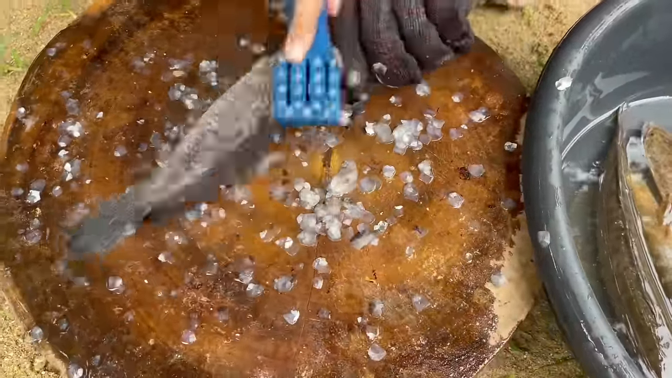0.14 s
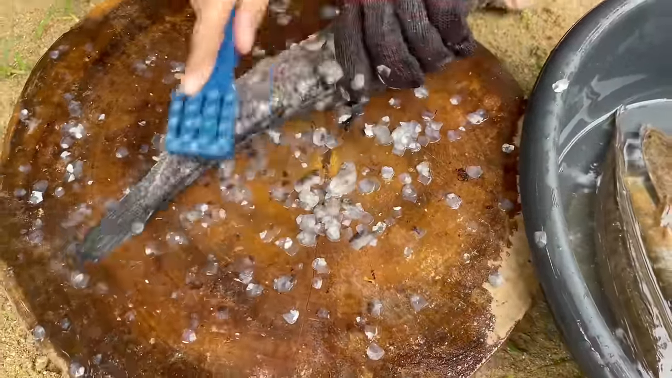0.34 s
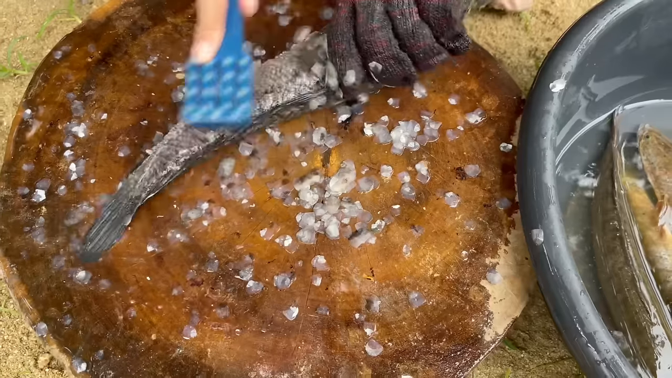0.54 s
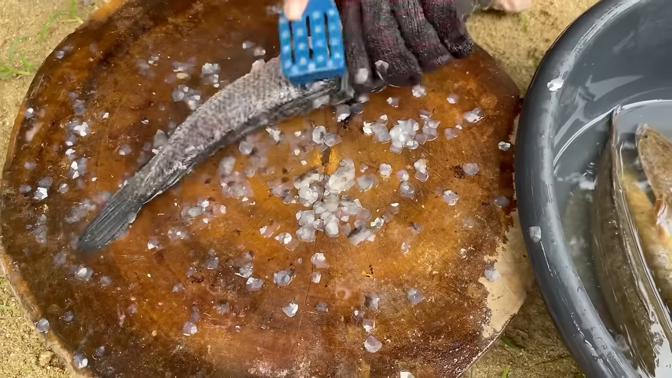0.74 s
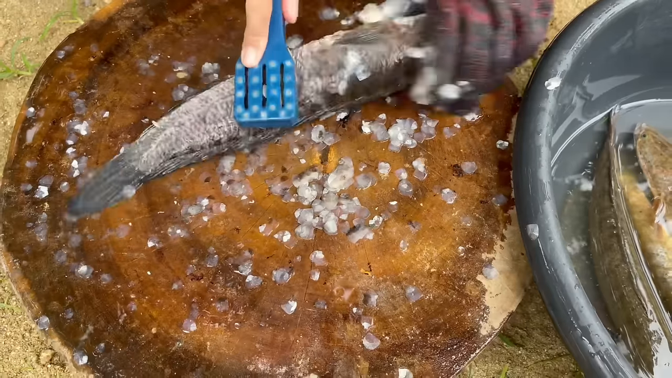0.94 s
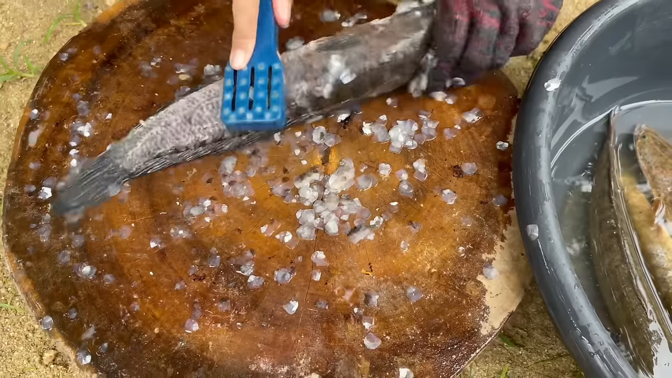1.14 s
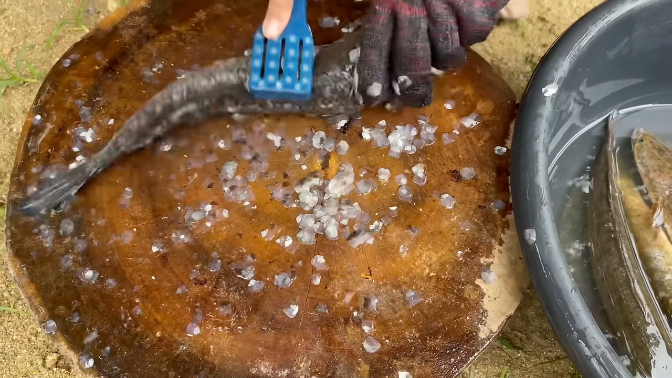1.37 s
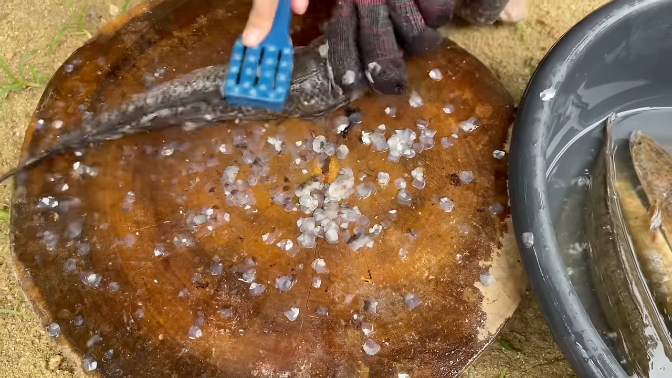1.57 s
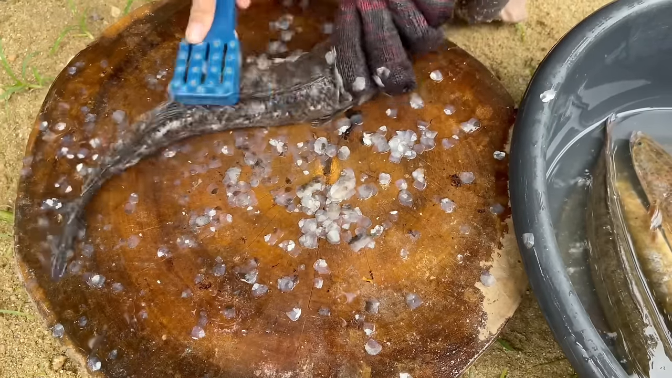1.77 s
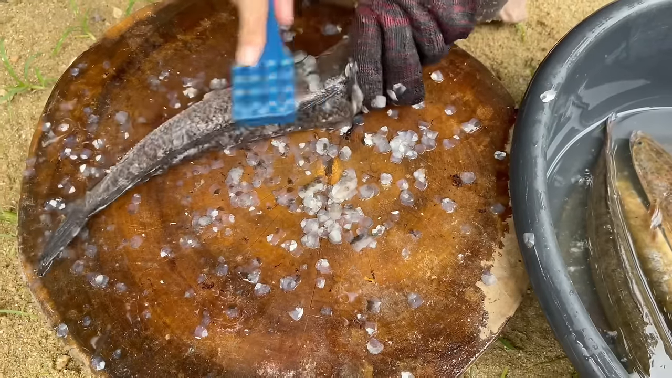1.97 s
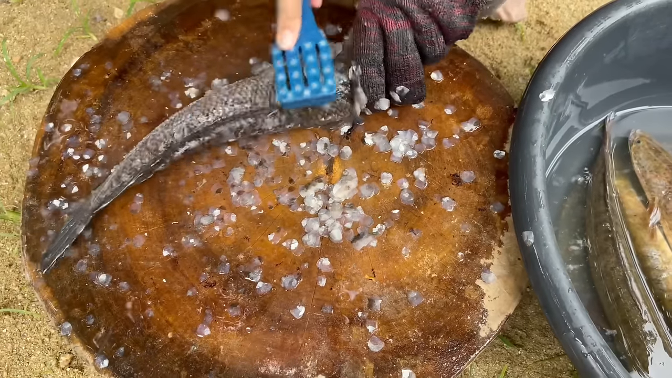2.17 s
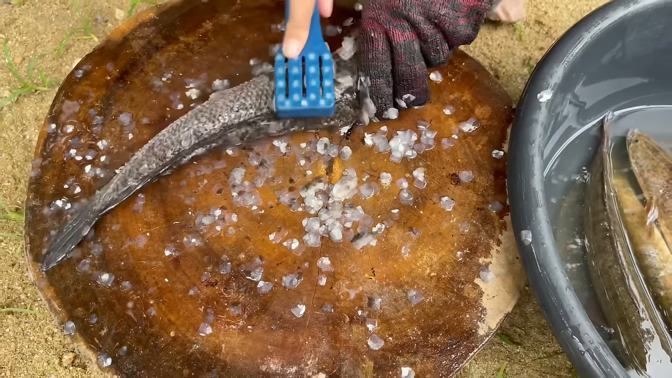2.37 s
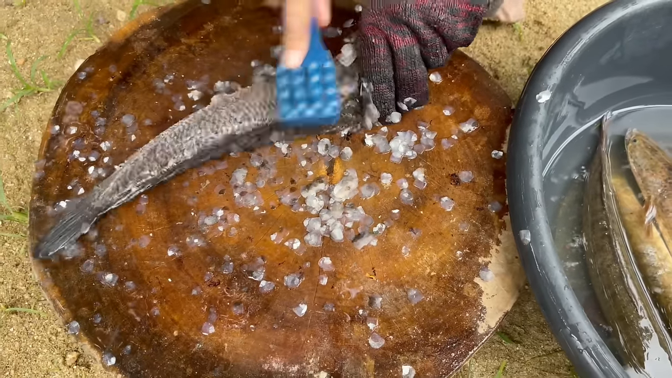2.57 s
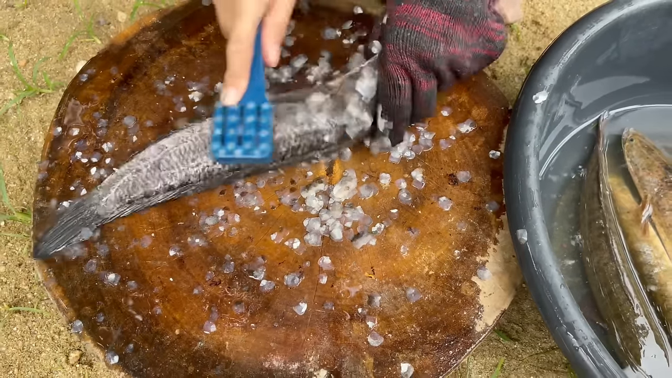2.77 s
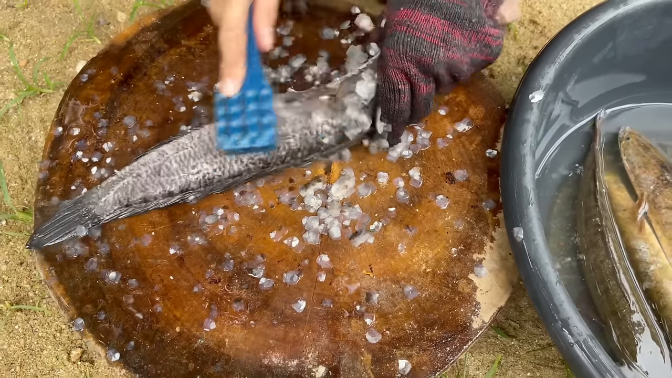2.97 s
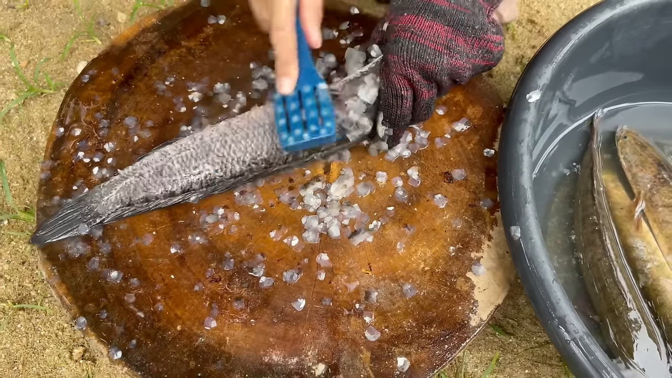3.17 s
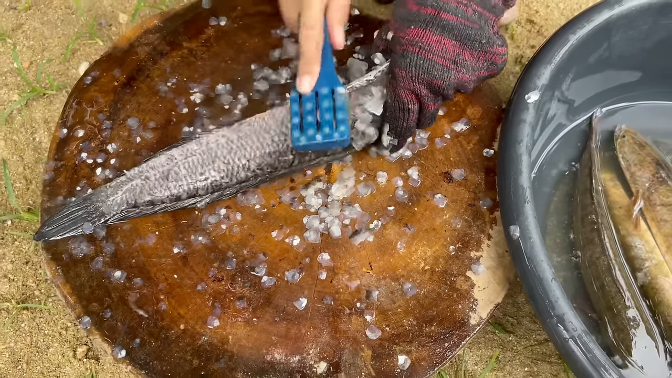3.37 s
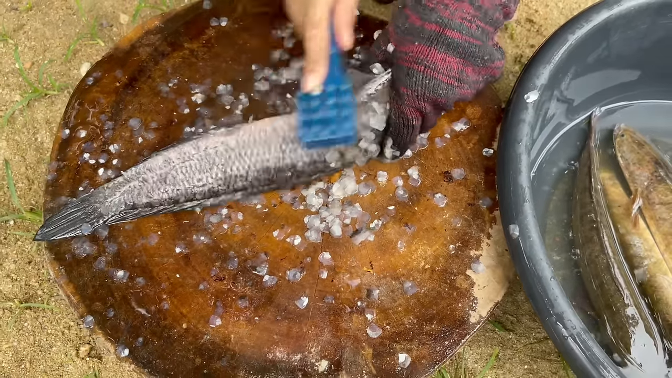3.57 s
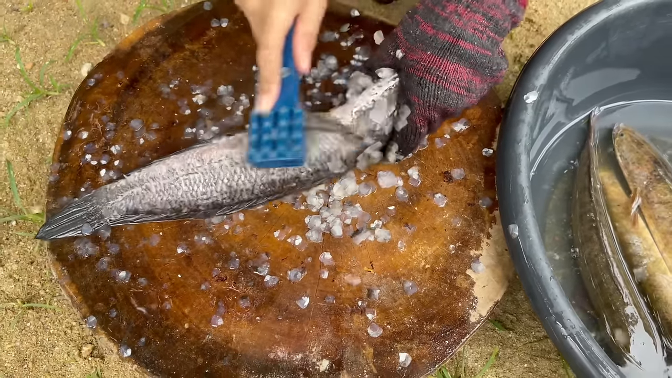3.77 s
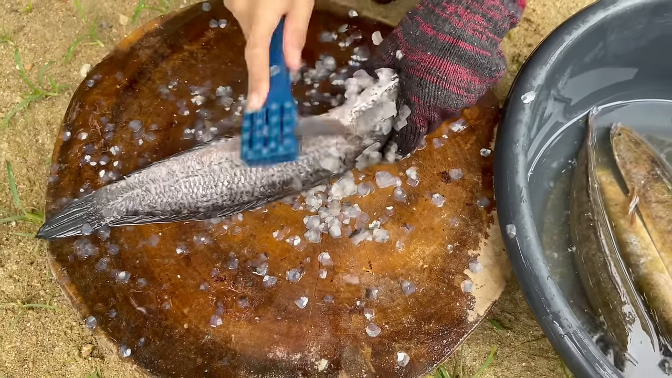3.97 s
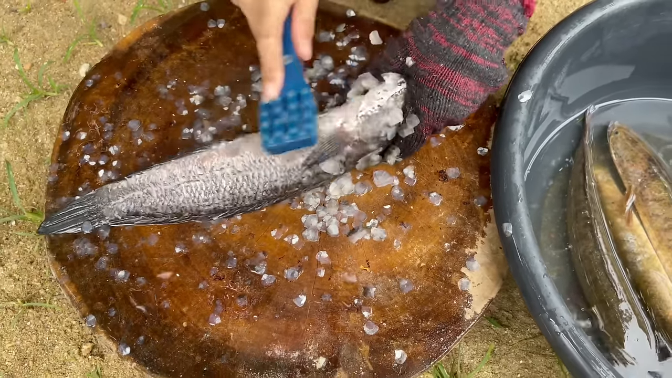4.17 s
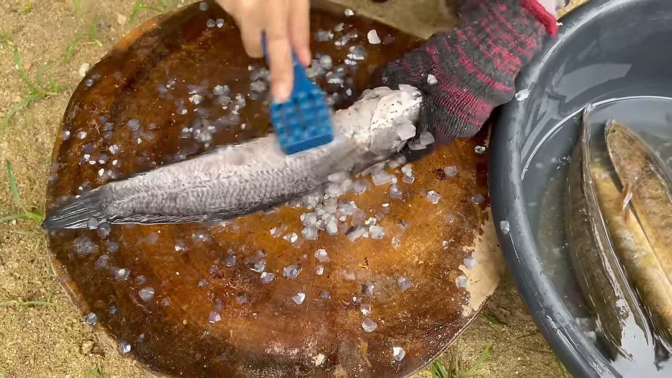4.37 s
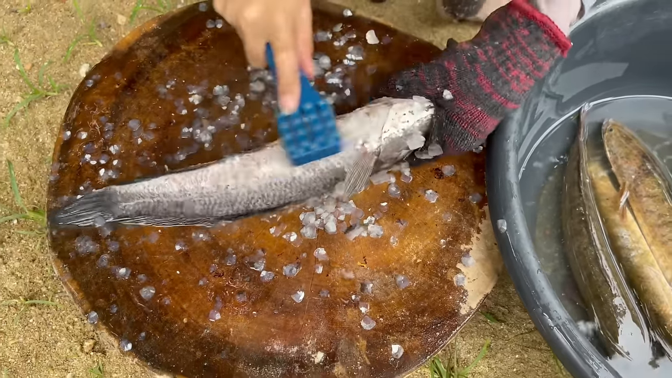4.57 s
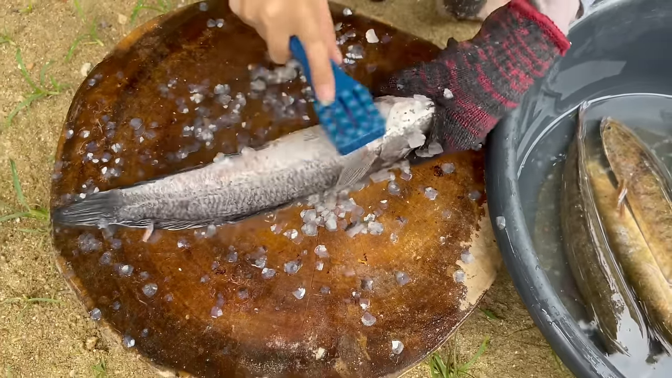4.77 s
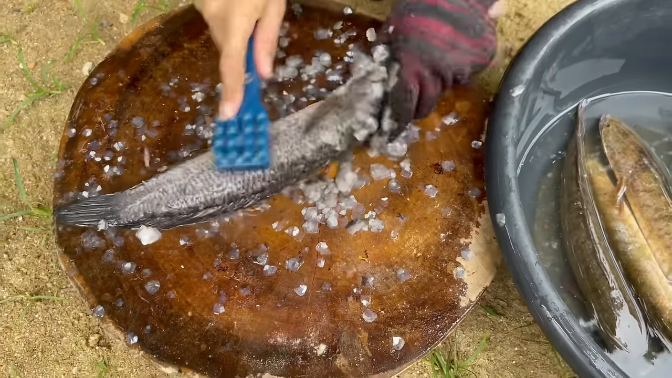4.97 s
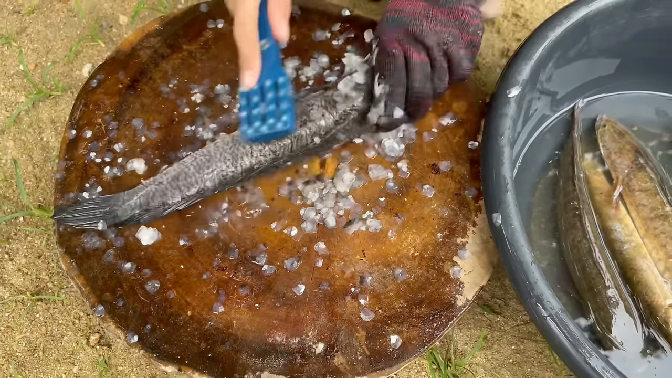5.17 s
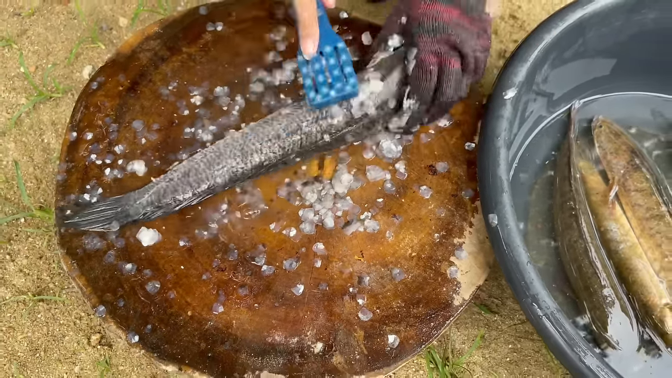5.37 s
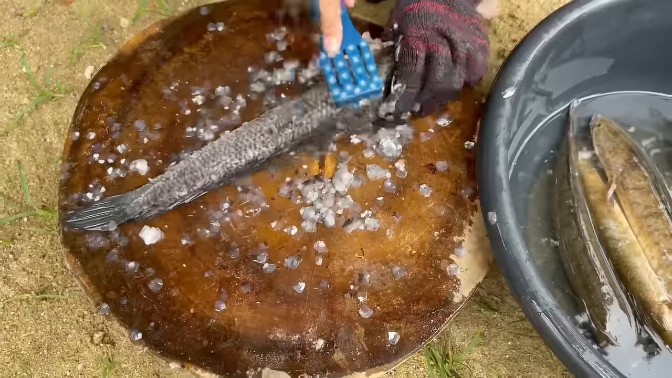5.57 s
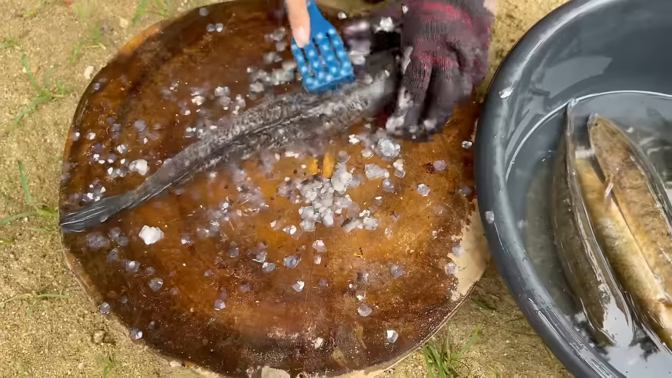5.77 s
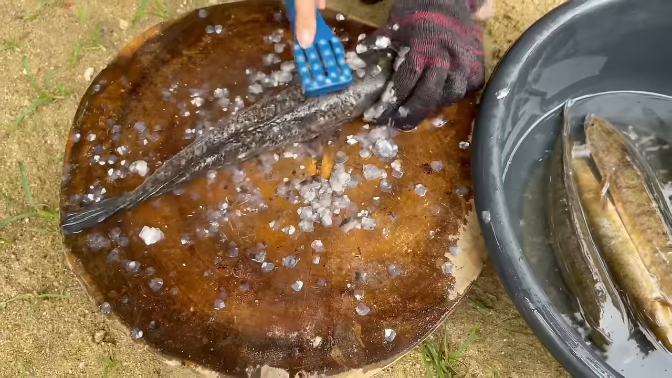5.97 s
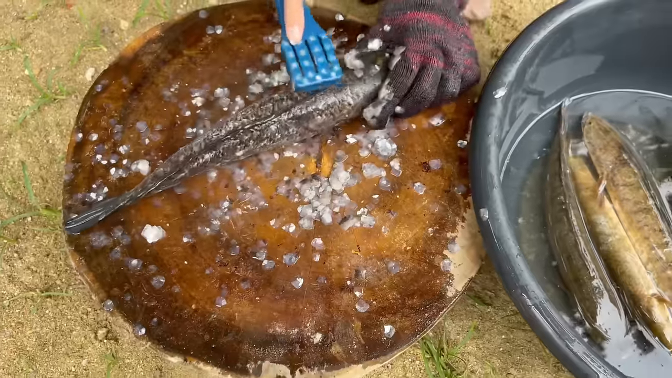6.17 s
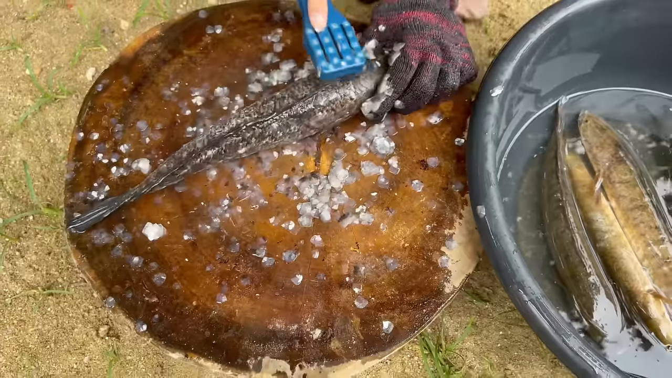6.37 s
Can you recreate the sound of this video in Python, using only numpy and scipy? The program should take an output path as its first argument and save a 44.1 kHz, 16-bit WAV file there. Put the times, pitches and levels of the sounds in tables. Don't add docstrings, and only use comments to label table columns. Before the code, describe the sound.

Close to a phone microphone in an open yard, a toothed plastic scaler rasps a fish in short uneven strokes. Each scrape is gritty and hissy, with crackling scales, sharp snaps and a low hollow drumming of fish and wooden block. Strokes grow denser and loudest around three seconds, then lighten and thin out. Behind run a steady high cicada chorus, repeated cricket trills, faint bird whistles and distant rumble.

```python
import sys
import numpy as np
from scipy import signal
from scipy.fft import rfft, irfft
from scipy.io import wavfile
from scipy.ndimage import uniform_filter1d

SR = 44100
rng = np.random.default_rng(int(sys.argv[2]) if len(sys.argv) > 2 else 0)


def file_out(sig):
    cols = np.atleast_2d(sig).T
    lim = np.clip(cols, -1, 1)
    pcm = np.round(lim * 32767).astype(np.int16)
    wavfile.write(sys.argv[1], SR, pcm)


def magnitude_from_level(level_db):
    exponent = np.asarray(level_db, float) / 20
    return 10 ** exponent


N = 283563
TIME = np.arange(N) / SR


def evened(x):
    return x / np.sqrt(np.mean(x ** 2) + 1e-20)


def read(points, hz):
    f, *columns = np.transpose(points)
    return [np.interp(np.log(hz + 1), np.log(f + 1), c) for c in columns]


def follow(points):
    return np.interp(TIME, *np.transpose(points))


def colour(x, points):
    gain_db = read(points, np.fft.rfftfreq(N, 1 / SR))[0]
    return irfft(rfft(x) * magnitude_from_level(gain_db), N)


def resonate(x, hz, width):
    turn = np.exp(2j * np.pi * np.cumsum(hz * np.ones(N)) / SR)
    decay = np.exp(-np.pi * width / SR)
    return 2 * (turn * signal.lfilter([1 - decay], [1, -decay], x / turn)).real


def slips(per_s, spread_db, last_s):
    size = magnitude_from_level(spread_db * np.minimum(rng.exponential(1, N), 4))
    size = size * (rng.random(N) < per_s / SR)
    puff = signal.filtfilt([1], [1, -np.exp(-1 / (last_s * SR))], size)
    return evened(puff * rng.standard_normal(N))


def shape(times, levels_db, rise_s, fall_s):
    t = np.maximum.accumulate([times[0] - rise_s, *times, max(times) + fall_s])
    span = slice(max(round(t[0] * SR), 0), round(t[-1] * SR))
    levels_db = [levels_db[0] - 28.5, *levels_db, levels_db[-1] - 23]
    return span, magnitude_from_level(np.interp(TIME[span], t, levels_db))


def fade(start, end, ramp_s):
    return np.clip(np.minimum(TIME - start, end - TIME) / ramp_s, 0, 1)


def wash(points, patchy_db, level):
    a, b, patches = rng.standard_normal((N // 256 + 5, 513, 2, 3)).T
    patches = uniform_filter1d(patches[0], size=12, axis=0)
    patches = evened(uniform_filter1d(patches, size=14, axis=1))
    noise = signal.istft((a + 1j * b) * magnitude_from_level(patchy_db * patches), nperseg=1024, noverlap=768)[1][:, :N]
    return magnitude_from_level(follow(level)) * evened(colour(noise, points))


# (frequency [Hz], density [dB per Hz])
RUMBLE_SPECTRUM = [(32, -46), (43, -8), (60, 2.5), (100, -2), (160, -10.5), (300, -20), (500, -67.5)]
# (time [s], level [dB])
RUMBLE_LEVEL = [(0.0, -53), (0.09, -44.5), (6.32, -44.5), (6.43, -52)]


def rumble():
    return wash(RUMBLE_SPECTRUM, 1.56, RUMBLE_LEVEL)


# (frequency [Hz], density [dB per Hz])
YARD_SPECTRUM = [(60, -1), (200, -2), (400, -5), (700, -6), (1300, -9.5), (2500, -10.5), (3600, -9.5),
                 (5400, -10), (7000, -13.5)]
# (time [s], level [dB])
YARD_LEVEL = [(0.0, -46.5), (0.61, -47.5), (3.04, -48.5), (6.43, -48.5)]


def yard():
    return magnitude_from_level(3.2) * wash(YARD_SPECTRUM, 3.2, YARD_LEVEL)


# (frequency [Hz], density [dB per Hz])
CHORUS_SPECTRUM = [(5700, -57), (6200, -4.5), (6800, 5.5), (7800, 0), (8600, -2), (9700, -11),
                   (11100, -2.5), (12400, -17.5), (13100, -6.5), (15600, -48), (16100, -66)]
# (time [s], level [dB])
CHORUS_LEVEL = [(0.0, -41), (3.97, -40.5), (5.37, -40), (6.43, -40)]


def cicadas():
    return magnitude_from_level(2.5) * wash(CHORUS_SPECTRUM, 2.2, CHORUS_LEVEL)


# (time [s], pressed flat [0-1])
GRIP_COURSE = [(0, 0.08), (.4, 0), (.7, 0.23), (1.3, 0.23), (2.1, 0.03), (2.6, 0.4), (3.1, 0.72),
               (3.6, 0.66), (3.85, 0.9), (5, 0.4), (5.4, 1), (5.55, 1), (6.43, 0.45)]


def pressed():
    return np.clip(follow(GRIP_COURSE), 0, 1)


# (frequency [Hz], width [Hz], level held loosely [dB], level pressed flat [dB])
SCALER_MODES = [(1120, 1800, -20, -34.5), (2004, 120, -19, -3), (2680, 1320, -19.5, -11.5),
                (3557, 367, 2, 7), (3945, 1430, 2.5, 0.5), (5430, 2710, 1, -4)]


def scaler_ring(x):
    flat, ring = pressed(), np.zeros(N)
    for k, (hz, width, loose_db, flat_db) in enumerate(SCALER_MODES):
        gain = magnitude_from_level(loose_db + flat * (flat_db - loose_db))
        ring += (-1) ** k * gain * resonate(x, hz, width)
    return ring


def patter():
    return magnitude_from_level(-46) * scaler_ring(slips(60, 4.0, 0.0004))


# (frequency [Hz], density [dB per Hz])
SCALE_HISS = [(4500, -15.5), (6000, -11.5), (8000, -3.5), (9500, 1), (11000, 3), (12200, -6.5),
              (13500, -23), (15600, -44), (16100, -56)]
# (time [s], hiss over rasp [dB])
TOOTH_BITE = [(0.1, 6.5), (.7, 7), (1.25, 2), (1.5, 6.5), (1.85, 4.5), (2.1, 7), (2.6, 5), (3.1, 2.5),
              (3.45, 3), (3.6, 4), (4.05, 6.5), (4.2, 9), (4.45, 2.5), (4.6, 8.5), (5, -1), (5.3, 14),
              (5.57, 5.5), (6.3, 1)]
# (start [s], end [s], rasp at the end [dB])
DIG_STROKES = [(.016, .056, -48), (.098, .143, -23.5), (.156, .203, -45.5), (.221, .253, -43),
               (.348, .388, -26.5), (.398, .43, -27.5), (.444, .459, -29.5), (.642, .675, -23.5),
               (.684, .71, -22), (.828, .92, -43.5), (1.294, 1.335, -27), (1.66, 1.69, -36),
               (1.717, 1.74, -41), (1.838, 1.86, -27.5), (1.878, 1.915, -29.5), (2.066, 2.111, -24),
               (2.122, 2.136, -24), (2.188, 2.233, -39.5), (2.545, 2.587, -21.5), (2.599, 2.615, -21),
               (2.66, 2.704, -42), (2.83, 2.85, -23), (3.046, 3.081, -23), (3.087, 3.106, -16.5),
               (3.295, 3.339, -20), (3.457, 3.503, -39), (3.54, 3.574, -19.5), (3.588, 3.607, -19),
               (3.692, 3.727, -39), (3.803, 3.834, -27), (3.854, 3.862, -20), (4.023, 4.06, -28),
               (4.569, 4.64, -39), (4.815, 4.86, -36), (4.98, 5.02, -27.5), (5.273, 5.305, -53),
               (6.373, 6.379, -30.5)]
# (start [s], end [s], rasp near the start [dB])
SKIM_STROKES = [(.503, .526, -47), (1.232, 1.26, -38), (1.352, 1.385, -31.5), (1.438, 1.48, -44),
                (1.552, 1.612, -40.5), (1.953, 1.995, -42.5), (2.313, 2.352, -22.5), (2.432, 2.49, -39.5),
                (2.743, 2.754, -32), (2.797, 2.825, -23.5), (2.862, 2.88, -24.5), (2.944, 3.09, -43),
                (3.186, 3.26, -38.5), (3.43, 3.431, -37), (3.636, 3.645, -25), (3.73, 3.765, -35.5),
                (3.902, 3.922, -31.5), (3.941, 3.98, -36), (4.152, 4.21, -46.5), (4.258, 4.28, -35),
                (4.372, 4.45, -41), (4.49, 4.53, -39), (4.767, 4.77, -35.5), (4.87, 4.905, -37.5),
                (5.03, 5.065, -29.5), (5.3, 5.3, -47), (5.568, 5.58, -27.5), (5.978, 6, -37),
                (6.066, 6, -52), (6.263, 6.274, -30.5), (6.3, 6.4, -47.5)]


def strokes():
    rasp, fizz, flat = np.zeros(N), np.zeros(N), pressed()
    contacts = []
    for start, end, db in DIG_STROKES:
        swell_db = 2 + 7 * flat[round(start * SR)]
        contacts.append((db, [start, end], [db - swell_db, db], 0.012))
    for start, end, db in SKIM_STROKES:
        crest = start + 0.29 * (end - start)
        contacts.append((db, [start, crest, end], [db - 4.5, db, db - 5.5], 0.016))
    for db, times, levels_db, fall_s in contacts:
        span, gain = shape(times, levels_db, 0.022, fall_s)
        bite_db = np.interp(times[0], *np.transpose(TOOTH_BITE))
        rasp[span] += gain
        fizz[span] += gain * magnitude_from_level(bite_db + 0.1411 * (-25 - db))
    rasp *= magnitude_from_level(-7 * ((TIME > 4.9) & (TIME < 5.4)))
    teeth = slips(800, 2.13, 0.00076)
    hiss = colour(teeth + 2.34 * slips(2000, 0.32, 0.00026), SCALE_HISS)
    return magnitude_from_level(2.5) * rasp * evened(scaler_ring(teeth)) + magnitude_from_level(3.0) * fizz * evened(hiss)


# (time [s], scaler ring [dB], fizz [dB])
TOOTH_CATCHES = [(.1007, -9, -10.5), (.141, -1, -2), (.2094, -15.5, -26), (.628, -11, -25),
                 (.6953, -13, -2), (1.3168, 3.5, .5), (1.6801, -27, -41), (1.9066, -4, -5.5),
                 (5.5745, -8, -5), (2.1319, 3.5, 1), (2.604, 5, 2), (2.6151, -11, -7.5), (2.7903, -25, -27),
                 (2.836, 4, -10), (2.8474, 4.5, 0.5), (3.0416, -21.5, -11), (3.0722, -26, -5),
                 (3.0993, 7.5, -17), (3.1047, 1, -20), (3.3335, -6, 1.5), (3.5693, -14, -2),
                 (3.589, -13, -20), (3.6064, 6.5, 1), (3.6318, -4, -4), (3.6895, -3.5, -6.5),
                 (3.7048, -8, -16), (3.7966, -17, -21), (3.8591, -2, -30), (3.922, -9, -14),
                 (4.0594, 4, -8.5)]
# (time [s], fizz [dB])
SCALE_CRACKS = [(.0896, -14.5), (.4252, -7), (.4426, -8.5), (.449, -6), (.663, -22), (0.7038, -2.5),
                (1.3634, -8.5), (1.3876, -15), (1.5604, -15.5), (1.7417, -11.5), (1.8551, -3.5),
                (1.8888, -18), (2.138, -10), (2.3356, -6.5), (2.5798, -1.5), (2.808, -5), (2.8415, -5.5),
                (3.0899, 7), (3.2062, -12.5), (3.315, -19), (3.4627, -14.5), (3.699, -7), (3.8178, -9.5),
                (4.0215, -13.5), (4.1792, -13), (4.2908, -10.5), (5.3074, -15), (5.3338, -14), (5.582, -19),
                (6.2588, -14), (.3456, -19), (.6379, -19), (.6848, -14), (1.3004, -18), (1.8447, -13.5),
                (2.3047, -20), (2.3171, -14), (2.5531, -15), (2.7442, -17.5), (3.2894, -23), (3.5334, -24),
                (3.5548, -14), (4.517, -18.5), (4.9871, -20), (5.0085, -12.5), (5.9783, -12),
                (.0084, -22), (.357, -22), (0.492, -22), (0.8615, -20.5), (1.2662, -16.5), (1.657, -39),
                (1.694, -16.5), (1.979, -16), (2.514, -30), (2.67, -19), (2.882, -15), (2.956, -20.5),
                (3.1928, -22), (3.4487, -16.5), (4.1172, -22), (4.2069, -19), (4.348, -24), (4.388, -19),
                (4.5036, -15.5), (4.5264, -19), (4.8018, -14.5), (4.816, -15.5), (4.874, -25),
                (5.281, -19.5), (5.738, -24.5), (5.3228, -29), (4.1722, -18.5), (6.063, -16), (6.3031, -23),
                (6.38, -29)]
# (time [s], scaler ring [dB])
HEAD_TAPS = [(1.596, -22), (1.364, -12), (1.7287, -28), (1.7419, -11), (2.8197, -13), (5.3086, -11),
             (2.0698, -22), (2.229, -36), (2.751, -33), (3.949, -24), (4.765, -24), (4.9878, -11),
             (5.156, -22.5), (5.263, -13.5), (5.386, -28), (5.4797, -49), (5.573, -11), (5.885, -18),
             (6.056, -26), (6.265, -17)]


def snaps():
    dull, bright, t = np.zeros(N), np.zeros(N), np.arange(-300, 500) / SR
    rows = [*TOOTH_CATCHES]
    rows += [(s, db - 57, db) for s, db in SCALE_CRACKS]
    rows += [(s, db, db - 9) for s, db in HEAD_TAPS]
    after = np.maximum(t, 0)
    form = np.exp(-after / 0.00066) + 0.13 * np.exp(-after / 0.0034)
    form *= np.minimum(after / 0.0006, 1)
    form += magnitude_from_level(-15.5) * np.exp(-abs(t) / 0.002)
    for (s, ring_db, fizz_db), noise in zip(rows, rng.standard_normal((len(rows), 800))):
        at = round(s * SR)
        crack = np.sign(noise) * form
        bright[at - 300:at + 500] += magnitude_from_level(fizz_db) * crack
        dull[at - 300:at + 500] += magnitude_from_level(ring_db) * crack
    thud = magnitude_from_level(-4) * (1 - pressed()) * resonate(dull, 1030, 600)
    return magnitude_from_level(11.5) * colour(bright, SCALE_HISS) + magnitude_from_level(4.0) * scaler_ring(dull) + thud


# (time [s], frequency [Hz])
FISH_PITCH = [(0.1, 616), (.38, 570), (.66, 670), (1.22, 503), (1.38, 637), (2.08, 528), (2.33, 590),
              (2.8, 524), (3.07, 504), (3.6, 574), (3.8, 540), (3.9, 592), (4.27, 538), (4.85, 558),
              (5.3, 466.5), (5.6, 643)]
# (factor on pitch [ratio], width [Hz], level [dB])
BODY_MODES = [(0.95, 155, 12), (1.226, 166, -2.5), (1.34, 65, -20), (0.66, 240, -9), (0.41, 120, -34.5)]
# (frequency [Hz], width [Hz], level [dB])
CUP_MODES = [(1900, 303, 1.5), (3900, 750, -1)]
# (start [s], hardest [s], end [s], drumming [dB])
FISH_ROCKS = [(0.094, 0.117, 0.14, -15), (0.354, 0.381, 0.42, -16), (0.496, 0.525, 0.51, -40.5),
              (0.64, 0.669, 0.69, -13), (0.802, 0.863, 0.95, -44.5), (1.192, 1.203, 1.22, -39),
              (1.234, 1.259, 1.275, -30), (1.297, 1.325, 1.32, -30.5), (1.352, 1.37, 1.38, -42.5),
              (1.527, 1.562, 1.56, -44.5), (1.74, 1.74, 1.762, -44), (1.826, 1.839, 1.855, -31),
              (1.897, 1.903, 1.94, -41), (2.063, 2.102, 2.08, -28.5), (2.127, 2.144, 2.11, -29),
              (2.193, 2.214, 2.263, -44), (2.312, 2.327, 2.35, -23), (2.433, 2.456, 2.48, -37),
              (2.545, 2.551, 2.605, -22), (2.595, 2.617, 2.64, -31.5), (2.74, 2.761, 2.771, -39),
              (2.793, 2.807, 2.85, -28), (2.831, 2.844, 2.88, -25.5), (2.943, 2.96, 3.02, -39.5),
              (3.048, 3.062, 3.114, -19), (3.181, 3.225, 3.2, -36.5), (3.238, 3.249, 3.265, -32.5),
              (3.289, 3.299, 3.35, -21), (3.454, 3.491, 3.513, -36.5), (3.539, 3.551, 3.6, -15.5),
              (3.59, 3.599, 3.61, -22.5), (3.636, 3.636, 3.646, -29), (3.69, 3.709, 3.723, -31),
              (3.73, 3.738, 3.775, -30), (3.802, 3.821, 3.835, -22), (3.856, 3.863, 3.85, -22.5),
              (3.907, 3.91, 3.92, -29), (3.947, 3.949, 3.988, -27), (4.022, 4.038, 4.064, -20),
              (4.158, 4.175, 4.24, -30.5), (4.257, 4.278, 4.29, -22), (4.376, 4.414, 4.45, -29),
              (4.462, 4.477, 4.47, -40), (4.483, 4.506, 4.47, -39), (4.565, 4.622, 4.64, -28.5),
              (4.829, 4.851, 4.93, -28), (4.973, 5.012, 5.084, -25), (5.271, 5.317, 5.34, -29),
              (5.557, 5.57, 5.65, -43.5), (5.971, 5.985, 5.97, -40)]


def drumming():
    push, pitch = np.zeros(N), follow(FISH_PITCH)
    for start, crest, end, db in FISH_ROCKS:
        slow_s = 0.26 * (end - start)
        levels_db = [db - 6.5, db, db - 8.5]
        span, gain = shape([start, crest, end], levels_db, 0.0058 + slow_s, 0.012 + slow_s)
        push[span] += gain
    drive = push * slips(5000, 0.5, 0.0014)
    loose_db = 30 * (1 - pressed())
    body = np.zeros(N)
    for factor, width, db in BODY_MODES:
        hz = factor * pitch
        mode = resonate(resonate(drive, hz, width), hz, 1.92 * width)
        body += magnitude_from_level(db + loose_db * abs(np.log(factor))) * mode
    tilted = (TIME > 4.93) & (TIME < 5.45)
    for hz, width, db in CUP_MODES:
        body += tilted * magnitude_from_level(db) * resonate(resonate(drive, hz, width), hz, width)
    return body * magnitude_from_level(-0.5) * np.sqrt(np.mean(push ** 2) / np.mean(body ** 2))


# (time [s], peak level [dB], pitch [Hz])
TOOTH_PINGS = [(.2089, -26, 3800), (1.59, -25, 5000), (1.597, -26, 5000), (1.6561, -24, 4800),
               (1.6775, -21, 4940), (1.683, -23, 5000), (1.6924, -19, 5000), (1.727, -23, 5150),
               (1.7416, -21, 5200), (1.8871, -20, 4500), (1.9563, -23, 5000), (1.9714, -22, 4800),
               (1.9794, -27, 5170), (2.4448, -28, 4130), (2.5134, -30, 5000), (2.7435, -11.5, 5450),
               (3.2001, -26, 3760), (3.4301, -24.5, 3970), (3.5694, -6, 5100), (3.6326, -17, 5800),
               (4.7662, -27.5, 3850), (4.9871, -27, 3800)]
# (time [s], peak level [dB], pitch [Hz])
HEAD_KNOCKS = [(0.14, -4, 1580), (0.449, -22, 950), (0.703, -14, 950), (1.316, -19, 961), (1.389, -31, 864),
               (1.741, -33, 519), (1.907, -22, 759), (2.133, -8, 1060), (2.584, -16, 820),
               (2.602, -11, 1160), (3.606, -8.5, 830), (5.155, -36, 647), (5.573, -35, 1878),
               (5.884, -30.5, 1173), (5.98, -41, 598), (6.057, -26.5, 1260), (6.264, -32, 651),
               (6.377, -30.5, 615)]


def pings():
    out, t = np.zeros(N), np.arange(-200, 600) / SR
    rows = [(s, db - 1, hz, 6.4) for s, db, hz in TOOTH_PINGS]
    rows += [(s, db - 2, hz, 1.8) for s, db, hz in HEAD_KNOCKS]
    for (s, db, hz, cycles), (phase, sag) in zip(rows, rng.random((len(rows), 2))):
        u = t * hz / cycles
        swell = np.exp(-np.where(u < 0, -4 * u, u))
        turns = hz * t * (1 - 0.029 * sag * u) + phase
        at = round(s * SR)
        out[at - 200:at + 600] += magnitude_from_level(db) * swell * np.sin(2 * np.pi * turns)
    return out


# (start [s], end [s], level [dB])
CRICKET_TRILLS = [
    (0.48, 1.077, -40),
    (1.6, 2.1, -43),
    (2.452, 2.85, -42),
    (3.363, 3.797, -41.5),
    (4.218, 4.506, -41.5),
    (4.913, 5.346, -40.5),
    (5.72, 6.118, -38),
]


def cricket():
    stroke_hz = 150 * (1 + 2.1 * uniform_filter1d(rng.standard_normal(N), size=800))
    turns = np.cumsum(stroke_hz) / SR
    air, on, hz = rng.standard_normal(N), np.zeros(N), np.full(N, 6420.)
    for start, end, db in CRICKET_TRILLS:
        on += magnitude_from_level(db) * fade(start, end, 0.0038)
        hz += 90 * np.clip((TIME - start) / (end - start), 0, 1) * (TIME < end)
    tone = evened(resonate(resonate(air, hz, 30), hz, 150))
    beats = np.exp(-(turns % 1) / 0.5)
    buzz = resonate(beats * evened(resonate(air, 6280, 300)), 6280, 400)
    return on * evened(tone + 1.1 * buzz)


# (start [s], end [s], from [Hz], to [Hz], level [dB])
BIRD_CALLS = [
    (.92, 1.19, 1240, 1320, -56),
    (5.6, 5.84, 430, 390, -56),
    (6.02, 6.11, 1260, 1240, -55),
    (6.17, 6.25, 1700, 1730, -59),
]


def bird():
    air, out = rng.standard_normal(N), np.zeros(N)
    for start, end, from_hz, to_hz, db in BIRD_CALLS:
        glide = np.interp(TIME, [start, end], [from_hz, to_hz])
        out += magnitude_from_level(db) * fade(start, end, 0.0036) * evened(resonate(air, glide, 55))
    return out


def scattered(x, last_s):
    tails = rng.standard_normal((3, 3000)) * np.exp(-np.arange(3000) / SR / last_s)
    turns = np.sqrt(2 / 3) * np.cos(2 * np.pi * (4.3 * TIME + np.arange(3)[:, None] / 3))
    return signal.oaconvolve(turns * x, tails / np.linalg.norm(tails[0]), axes=1)[:, :N].sum(0)


# (frequency [Hz], likeness near [0-1], likeness far [0-1], left leads by [rad], left minus right [dB])
MIC_PORTS = [(60, .95, .97, 0, 1.5), (600, .97, .75, .15, 3.5), (2400, .55, .3, .45, 3.6),
             (3500, .7, .45, 1.2, 3.6), (4500, .2, .25, .5, 5), (5900, .7, .65, 0, 3.5),
             (6900, .4, .4, .3, 2.5), (8600, .9, .97, 0, .5), (9900, .9, .99, -3.0, 0),
             (10400, .93, .995, -3.3, 0), (11700, .9, .9, -6.2, 0), (12700, .75, .99, -6.6, 0),
             (13700, .6, .99, -9.4, 0), (14800, .7, .99, -12.5, 0), (16000, .85, .99, -12.7, 0)]


def ports(x, other, near):
    same_near, same_far, lead, tilt_db = read(MIC_PORTS, np.fft.rfftfreq(N, 1 / SR))
    same = np.clip(same_near if near else same_far, 0, 1)
    right = same * np.exp(-1j * lead) * rfft(x) + np.sqrt(1 - same ** 2) * rfft(other)
    return irfft(np.array([rfft(x) * magnitude_from_level(tilt_db / 2), right / magnitude_from_level(tilt_db / 2)]), N)


# (from [Hz], to [Hz], share of time in the sum [0-1], share of time in the difference [0-1])
FAINT_BANDS = [(1500, 6000, 0, .22), (8000, 8900, 0, .5), (8900, 9600, .15, 0), (9600, 10450, .6, 0),
               (11700, 12500, .05, .55), (12500, 13200, .78, .8), (13200, 14500, .9, .6),
               (14500, 15800, .71, .9), (15800, 22050, .96, .97)]


def thrift(x):
    hz, _, z = signal.stft([x[0] + x[1], x[0] - x[1]], SR, nperseg=1024)
    level_db = 10 * np.log10(abs(z) ** 2 + 1e-20)
    budget_db = 8 * uniform_filter1d(rng.standard_normal(z.shape[2]), size=6)
    for low, high, *shares in FAINT_BANDS:
        inside = np.where((hz >= low) & (hz < high))[0]
        for band in np.array_split(inside, 1 + (high - low) // 500):
            merit = 0.5 * level_db[:, band].mean(1) + np.roll(budget_db, band[0] // 40)
            kept = np.array([m >= np.quantile(m, share) for m, share in zip(merit, shares)])
            z[:, band] *= kept[:, None]
    both, apart = signal.istft(z, SR, nperseg=1024)[1][:, :N]
    return np.array([both + apart, both - apart]) / 2


def scene():
    far = rumble() + yard() + cicadas()
    work = patter() + strokes() + snaps() + drumming() + pings()
    work += magnitude_from_level(-15.5) * scattered(work, 0.0071)
    callers = cricket() + bird()
    far += [callers, scattered(callers, 0.048)]
    return ports(work, scattered(work, 0.0068), True) + ports(*far, False)


def top_cut(x):
    return signal.sosfilt(signal.butter(12, 15900, fs=SR, output="sos"), x)


def record(dry):
    mix = thrift(np.clip(dry, -1, 1))
    return top_cut(mix)


dry = scene()
out = record(dry)
file_out(out)
```